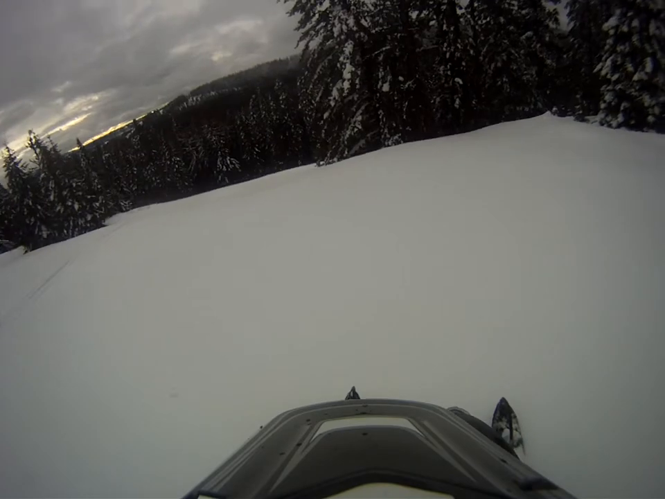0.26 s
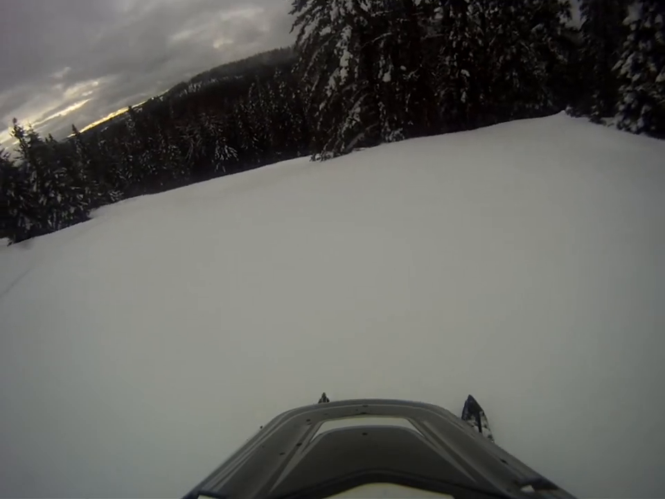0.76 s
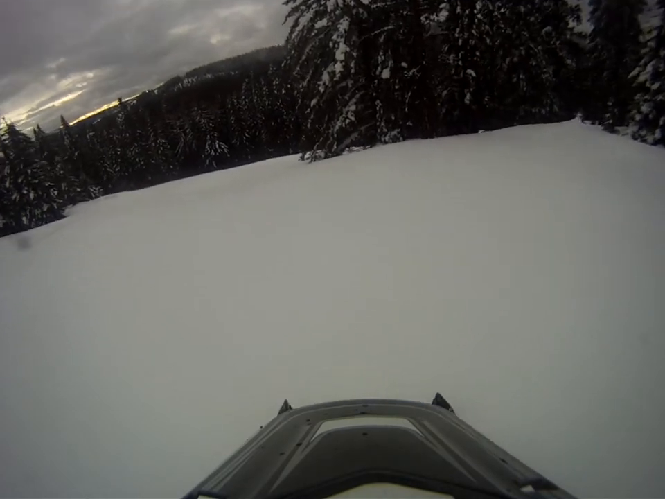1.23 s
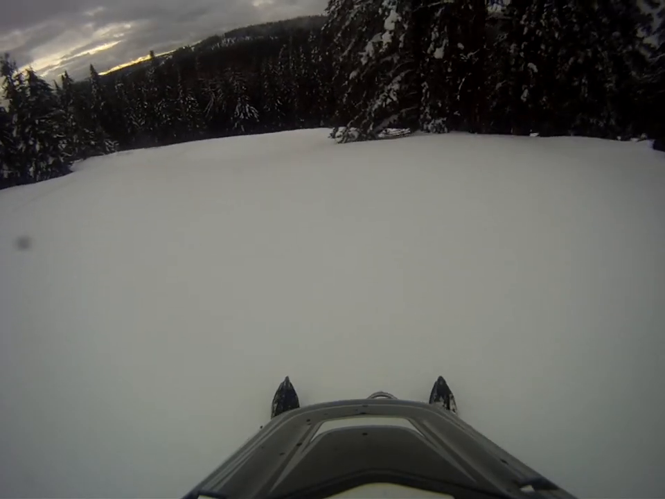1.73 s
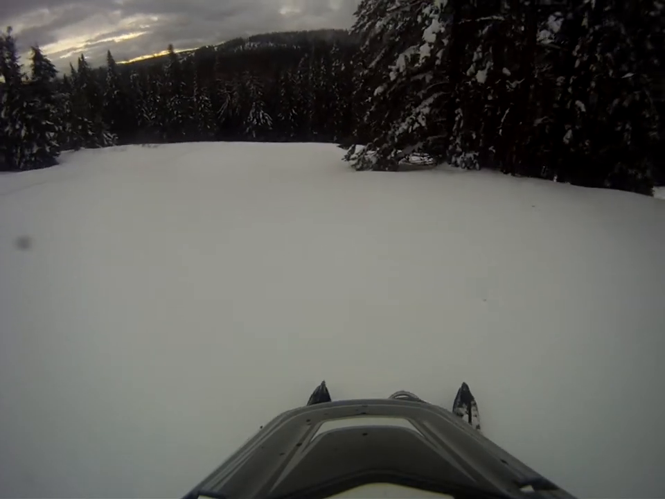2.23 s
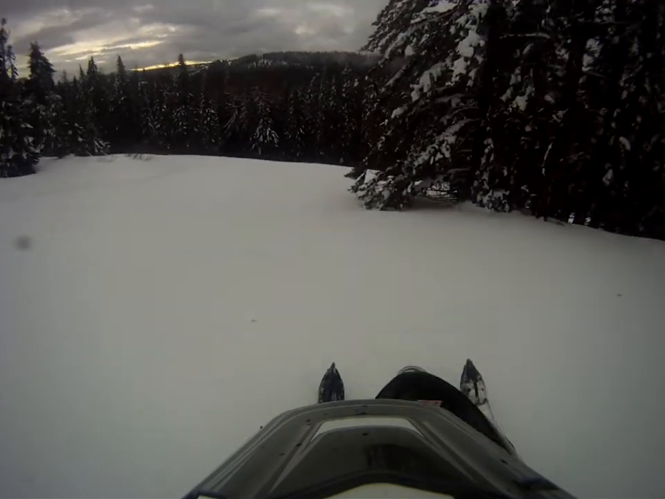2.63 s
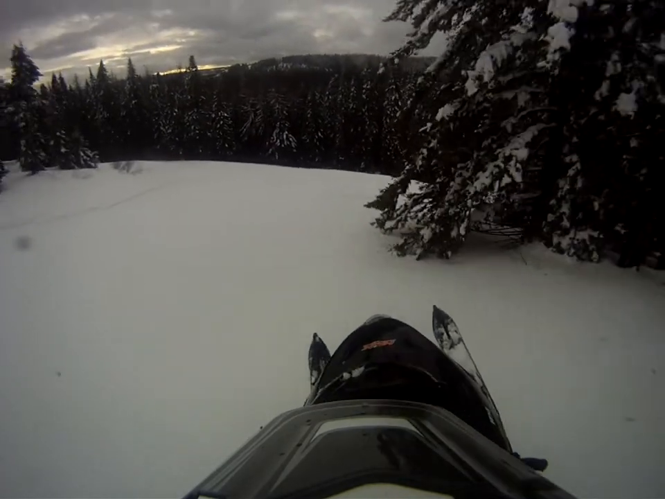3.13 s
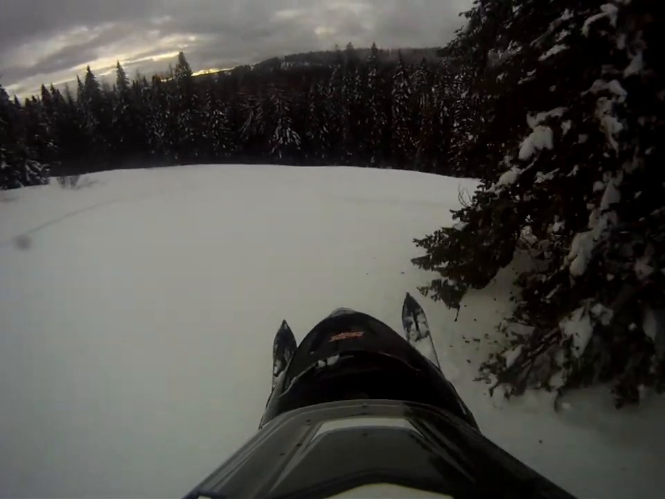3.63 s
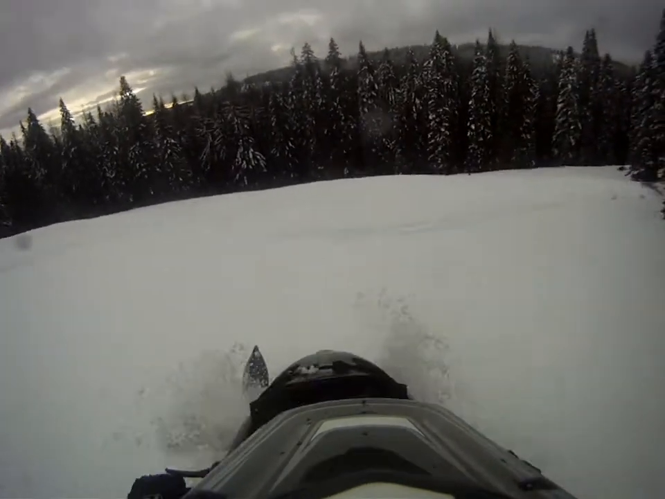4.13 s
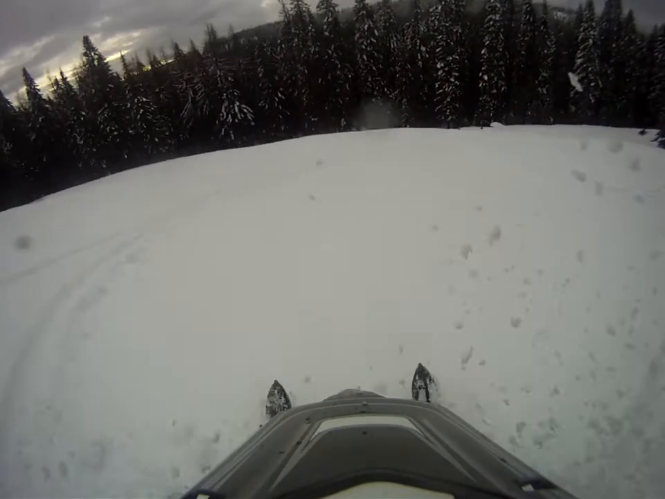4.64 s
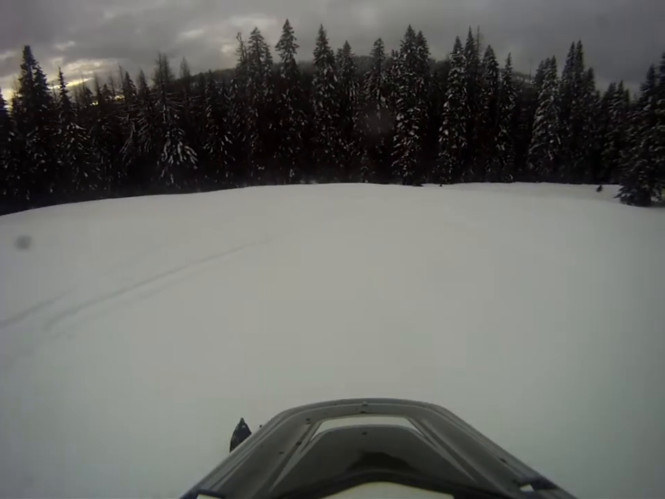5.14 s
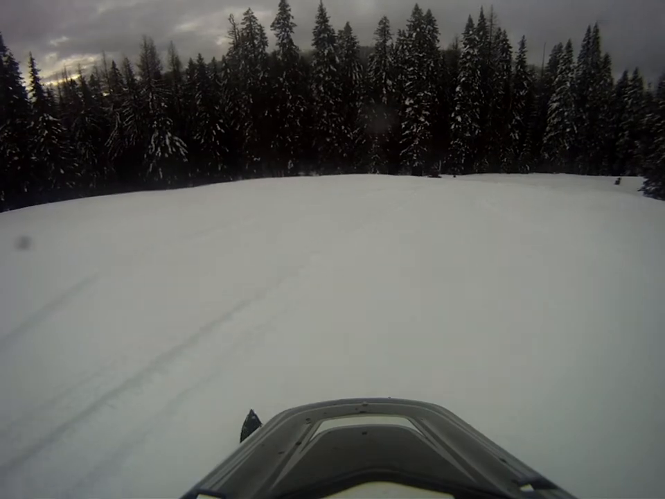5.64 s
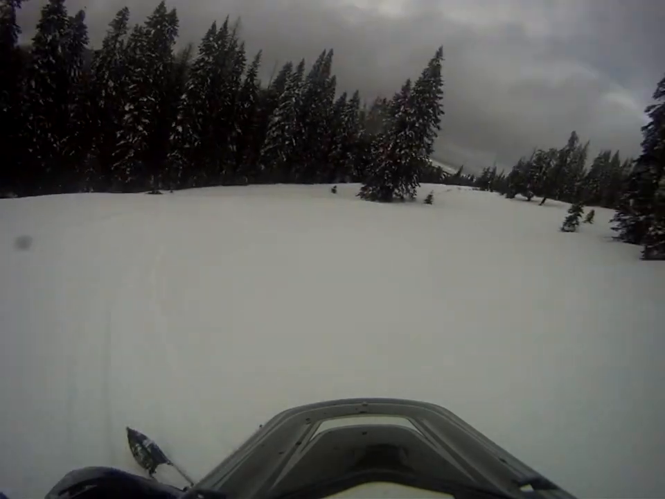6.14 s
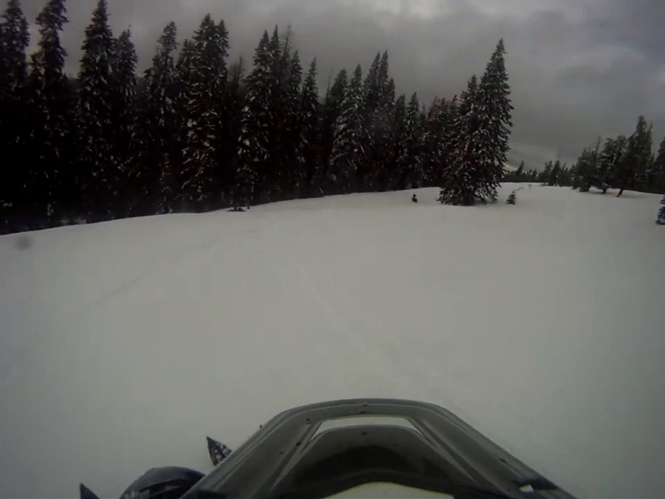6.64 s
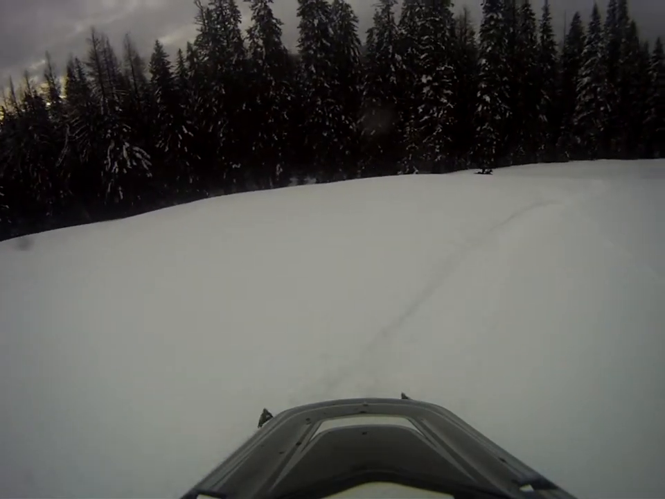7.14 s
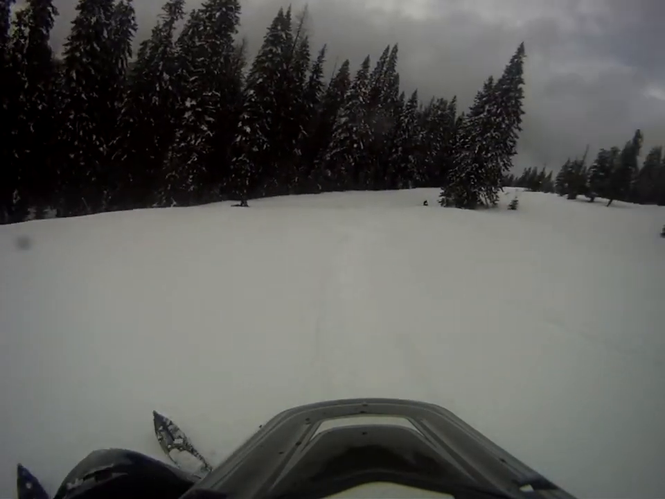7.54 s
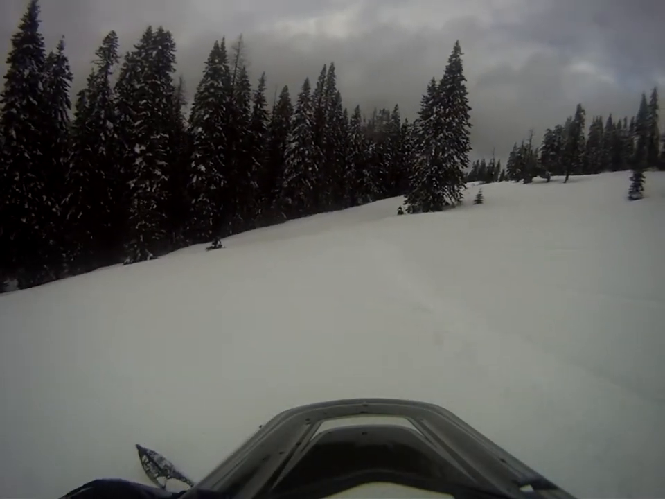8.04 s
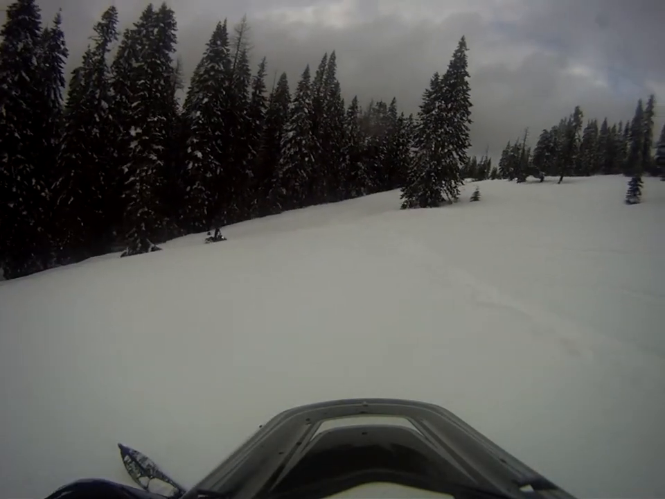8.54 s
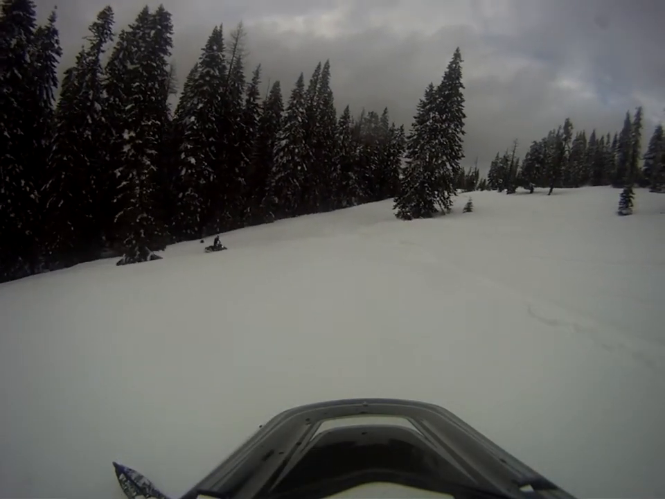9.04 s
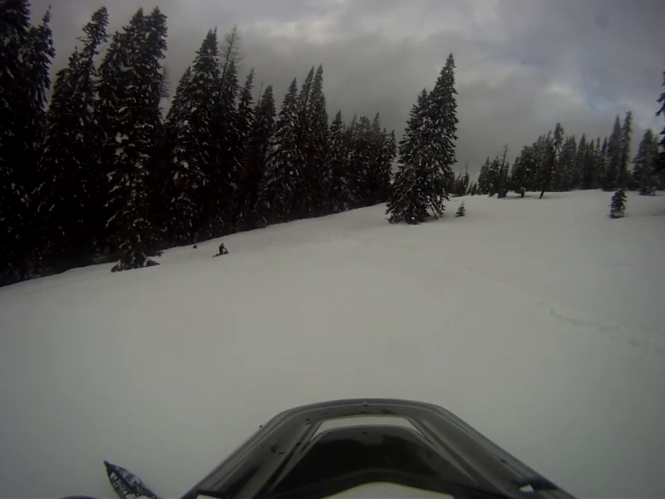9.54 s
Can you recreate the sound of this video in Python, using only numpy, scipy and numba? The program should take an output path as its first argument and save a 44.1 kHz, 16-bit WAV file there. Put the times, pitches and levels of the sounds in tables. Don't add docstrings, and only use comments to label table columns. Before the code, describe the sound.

Close, harsh helmet-camera sound of a snowmobile outdoors in snow: short revs, a steady rise to full throttle, chassis rumble and drive whine, then a single violent knock that makes the level duck. Snow ticks against the plastic housing as the revs fall. The engine settles to uneven popping with soft bumps, and another sled's thin, bright revving comes from farther up the slope near the end.

```python
import sys
import numpy as np
from scipy import signal
from scipy.fft import rfft, irfft
from scipy.io import wavfile
from numba import njit

SR = 44100
rng = np.random.default_rng(int(sys.argv[2]) if len(sys.argv) > 2 else 0)


def volts_from_decibels(level):
    exponent = np.asarray(level, float) / 20
    return 10 ** exponent


def generate_wav(signal):
    frames = np.transpose(np.atleast_2d(signal))
    scaled = np.clip(frames, -1, 1) * 32767
    pcm = np.round(scaled).astype(np.int16)
    wavfile.write(sys.argv[1], SR, pcm)


N = 431298


def rms_one(x):
    return x / np.sqrt(np.mean(x ** 2) + 1e-20)


def in_time(rows):
    s, *columns = np.transpose(rows)
    return [np.interp(np.arange(N) / SR, s, c) for c in columns]


def at_hz(points, hz):
    points_hz, points_db = np.transpose(points)
    return np.interp(np.log(hz), np.log(points_hz), points_db)


def lag(x, lag_s):
    r = np.exp(-1 / (lag_s * SR))
    return signal.lfilter([1 - r], [1, -r], x)


def drift(rate_hz, step=1):
    r = np.exp(-80 * np.pi * rate_hz / SR)
    noise = rng.standard_normal(N // 40 + 2002)
    slow = signal.lfilter([1], [1, -2 * r, r * r], noise)[2000:]
    return np.interp(np.arange(0, N, step) / 40, np.arange(len(slow)), rms_one(slow))


def colour(x, spectrum, rings=()):
    size = 1 << 14
    hz = np.maximum(np.fft.rfftfreq(size, 1 / SR), 1)
    level_db = np.maximum(at_hz(spectrum, hz), -75)
    for centre_hz, width_hz, top_db in rings:
        level_db = level_db + top_db / (1 + (2 * (hz - centre_hz) / width_hz) ** 2)
    cepstrum = irfft(np.log(volts_from_decibels(level_db)))
    cepstrum[1:size // 2] *= 2
    cepstrum[size // 2 + 1:] = 0
    pulse = irfft(np.exp(rfft(cepstrum)))
    return signal.oaconvolve(x, pulse / np.sqrt(np.sum(pulse ** 2)))[:N]


def ring(x, hz, t60_s):
    r, w = volts_from_decibels(-60 / (t60_s * SR)), 2 * np.pi * hz / SR
    return signal.lfilter([0, np.sin(w)], [1, -2 * r * np.cos(w), r * r], x + 1e-18)


# f/Hz, level/dB per Hz
CASE_SPECTRUM = [(480, -28.5), (820, -10), (937, -6), (1100, -4.5), (1150, -0.5), (1290, -8.5), (1580, -1),
                 (1930, -1), (2400, -2.5), (3010, -14), (3490, -4), (3730, -14), (4410, -23), (5430, -14.5),
                 (6000, -8), (7800, -101), (13200, -120)]


def through_case(x, rings=()):
    return colour(x, CASE_SPECTRUM, rings)


# t/s, chassis shake/dB, hiss brightness/dB
RIDE_COURSE = [(0, 0.1, -5.5), (2.4, 2, -4.5), (3.2, 9.5, 3.6), (4, 14.5, 7), (5.2, 10, 4), (6.1, 4, 9),
               (6.6, 0.5, 0.5), (8.1, -2, 3.2), (9.78, 0.5, 1.1)]


def ride():
    return in_time(RIDE_COURSE)


# f/Hz, level/dB per Hz
DRONE_SPECTRUM = [(53, -25.5), (90, 2.5), (129, -3.5), (195, -7.5), (312, -6), (343, -11), (389, -4),
                  (454, -10), (612, -20.5), (687, -24), (749, -2), (849, -25), (900, -7.5), (1170, -11),
                  (1980, -120)]
# f/Hz, level/dB per Hz
RUMBLE_SPECTRUM = [(7.1, -61), (12, -17), (22, -44), (40, -2.5), (54, -19), (65, 1.5), (86, -48),
                   (120, -35), (160, -39), (260, -120)]
# t/s, level/dB, length/s
SKI_BUMPS = [(.28, 10, 0.13), (2.25, 0, 0.32), (3.1, -1, .1), (3.66, 4, 0.18), (3.99, 6, 0.1),
             (4.5, -5.5, 0.26), (6.2, 6, 0.17), (6.766, 15, 0.055), (7.4, 3, 0.23), (7.673, 13, 0.24),
             (7.9, 0, 0.043)]
# t/s, level/dB, f/Hz, t60/s
MOUNT_JOLTS = [(0.311, -34, 103, .15), (0.631, -36.5, 85, 0.27), (.85, -35, 85, 0.27),
               (1.017, -30, 117, 0.19), (1.27, -35, 80, .2), (4.1, -20.5, 50.7, 0.67),
               (4.144, 17.5, 393, 0.017), (4.145, -4, 57, 0.28), (4.718, -6.5, 310, 0.0077),
               (4.721, -25.5, 57, 0.78), (6.802, -22.5, 57, 0.71), (6.811, -31, 154, 0.11),
               (6.815, -29, 334, 0.03)]
MOUNT_HZ = 57
DRONE_DB, RUMBLE_DB = -54.5, -56
RUMBLE_FOLLOWS_SHAKE, DRONE_FOLLOWS_BUMP = 0.92, 0.24


def chassis():
    t = np.arange(N) / SR
    shake_db = ride()[0]
    bump_db = sum(level_db * np.exp(-((t - s) / length_s) ** 2) for s, level_db, length_s in SKI_BUMPS)
    drone = colour(rng.standard_normal(N) * volts_from_decibels(1.5 * drift(12)), DRONE_SPECTRUM)
    lumps = rng.standard_normal(N) * volts_from_decibels(1.5 * drift(5))
    rumble = colour(lumps, RUMBLE_SPECTRUM, [(MOUNT_HZ, 9, 9)])
    out = volts_from_decibels(DRONE_DB + shake_db + DRONE_FOLLOWS_BUMP * bump_db) * rms_one(drone)
    out += volts_from_decibels(RUMBLE_DB + RUMBLE_FOLLOWS_SHAKE * shake_db + bump_db) * rms_one(rumble)
    for s, level_db, hz, t60_s in MOUNT_JOLTS:
        click = np.arange(N) == round(s * SR)
        out += volts_from_decibels(level_db) * ring(click, hz, t60_s)
    return out


# t/s, f/Hz
FAR_CRANK = [(8.7, 128), (9.05, 131), (9.25, 139), (9.4, 146), (9.52, 153.8), (9.78, 153.5)]
# t/s, level/dB
FAR_LOUDNESS = [(8.6, -82), (8.9, -66), (9.2, -51), (9.45, -51.5), (9.55, -47.5), (9.78, -51.5)]
# t/s, level/dB, length/s
FAR_HISS_SWELLS = [
    (8.337, -51, 0.22),
    (9.32, -49, 0.21),
]
FAR_START_S, FAR_HISS_FROM_HZ = 8.5, 3750


def far_machine():
    t = np.arange(N) / SR
    start, lines = round(FAR_START_S * SR), np.zeros(N)
    crank_turns = np.cumsum(in_time(FAR_CRANK)[0][start:]) / SR
    for k in range(5, 36):
        swell_turns = rng.random() + crank_turns * rng.uniform(.005, .02)
        swell = volts_from_decibels(4 * np.sin(2 * np.pi * swell_turns))
        lines[start:] += swell * np.cos(2 * np.pi * (k * crank_turns + rng.random()))
    high_pass = signal.butter(4, FAR_HISS_FROM_HZ, "high", fs=SR, output="sos")
    hiss = signal.sosfilt(high_pass, through_case(rng.standard_normal(N), [(5300, 390, 3.9)]))
    swells = sum(volts_from_decibels(level_db) * np.exp(-((t - s) / length_s) ** 2)
                 for s, level_db, length_s in FAR_HISS_SWELLS)
    return volts_from_decibels(in_time(FAR_LOUDNESS)[0] - 6.5) * rms_one(through_case(lines)) + swells * rms_one(hiss)


# t/s, f/Hz, level/dB
LUG_TONE = [(2.2, 87.9, -33.5), (2.499, 107.1, -28), (2.75, 151.5, -29), (2.878, 180, -31),
            (3.156, 244.6, -23), (3.35, 283, -32), (3.62, 297, -24), (3.86, 300, -29), (4.078, 200, -27)]


def track():
    rows = np.array(LUG_TONE)
    fade_in, fade_out = rows[:1] - [.15, 10, 40], rows[-1:] + [.1, 8, -70]
    hz, level_db = in_time(np.vstack([fade_in, rows, fade_out]))
    return volts_from_decibels(level_db - 16.0 + drift(9.5)) * np.sin(2 * np.pi * np.cumsum(hz) / SR)


# t/s, peak level/dB, f/Hz, t60/s
LANDING_KNOCK = (4.1416, 33, 2300, .019)
# t/s, peak level/dB, f/Hz, t60/s
SNOW_TICKS = [(4.146, 30.5, 2610, 0.011), (4.3558, -18.5, 2400, 0.036), (4.368, -39, 1930, .018),
              (4.3699, -2, 4900, .012), (4.3768, -21, 2100, 0.0095), (4.3826, -3, 2080, 0.0087),
              (4.4012, -10, 2230, 0.026), (4.4118, -12, 1360, 0.0073), (4.433, -15, 2200, 0.031),
              (4.519, -19, 3500, .03), (4.636, -42, 1697, .02), (4.638, 0, 1760, 0.0075),
              (4.6405, -15, 1300, 0.049), (4.665, -8, 2110, 0.0054), (4.7175, -12, 2050, 0.0078),
              (4.7187, 19, 2180, 0.0093), (4.7235, 1.5, 3600, 0.022), (4.7435, -7, 4300, 0.018),
              (4.755, -7.5, 2030, 0.033), (6.807, -25.5, 1260, 0.016), (6.8145, -28.5, 1840, .041),
              (7.568, -36, 2050, 0.026), (7.5995, -27, 1860, 0.036), (7.65, -31, 1210, 0.034),
              (.022, -42, 1220, 0.014)]
CRACK_SHARE = 0.29


def hits():
    out, t = np.zeros(N), np.arange(round(.12 * SR)) / SR
    grit = rms_one(through_case(rng.standard_normal(N))) * 2.18
    for s, peak_db, hz, t60_s in [LANDING_KNOCK] + list(SNOW_TICKS):
        i = round(s * SR)
        fade = volts_from_decibels(peak_db - 60 * t / t60_s) * (1 - np.exp(-t / .0002))
        tone = np.sin(2 * np.pi * hz * t)
        out[i:i + len(t)] += fade * ((1 - CRACK_SHARE) * tone + CRACK_SHARE * grit[i:i + len(t)])
    return out


# t/s, f/Hz
FIRING_RATE = [(0, 117.5), (.3, 104.6), (.47, 137), (.6, 163), (.8, 132), (1, 121.5), (1.19, 142.1),
               (1.31, 134.1), (1.52, 148.6), (2.05, 178), (2.44, 195), (2.63, 245.3), (2.85, 272.5),
               (3.3, 277.4), (3.7, 267.8), (3.86, 266.9), (3.97, 218), (4.12, 182)]
COAST_FROM_S, COAST_FROM_HZ, COAST_SAG_HZ_PER_S = 4.3, 167, 49
CLUTCH_LETS_GO_S, IDLE_REACHED_S, IDLE_HZ = 6.1, 6.5, 41


def speed():
    dragged_hz = COAST_FROM_HZ - COAST_SAG_HZ_PER_S * (CLUTCH_LETS_GO_S - COAST_FROM_S)
    coast = [(COAST_FROM_S, COAST_FROM_HZ), (CLUTCH_LETS_GO_S, dragged_hz), (IDLE_REACHED_S, IDLE_HZ)]
    return in_time(list(FIRING_RATE) + coast)[0]


def coasting_and_idling():
    return in_time([(FIRING_RATE[-1][0], 0, 0), (COAST_FROM_S, 1, 0),
                    (CLUTCH_LETS_GO_S, 1, 0), (IDLE_REACHED_S, 1, 1)])


def on_song(per_s):
    from_hz, full_hz = 195, 250
    return np.clip((per_s - from_hz) / (full_hz - from_hz), 0, 1)


# opened t/s, shut t/s, level/dB, dying away/s
THROTTLE_PULLS = [
    (0.308, 0.59, 0, 0.086),
    (.99, 1.176, -3, 0.09),
    (1.32, 3.86, -2.7, .4),
]
OPEN_S = 0.03


def throttle():
    t, opening, pull_db = np.arange(N) / SR, 0, 0
    for opened_s, shut_s, level_db, dying_s in THROTTLE_PULLS:
        rise, fall = (t - opened_s) / OPEN_S, 1 - (t - shut_s) / dying_s
        held = np.clip(np.minimum(rise, fall), 0, 1)
        opening, pull_db = opening + held, pull_db + held * level_db
    return np.minimum(opening, 1), pull_db


# f/Hz, level/dB per Hz
PIPE_SPECTRUM = [(59, -46), (100, -18), (279, -12.5), (405, -21), (557, -14.5), (717, -25.5), (1000, 5.5),
                 (1380, -1.5), (1690, 8.5), (1870, 4.5), (2260, 4.5), (2850, -17), (3800, -7), (4810, -22),
                 (5600, -5.5), (7280, -50), (12300, -120)]
HEADER_HZ, HEADER_WIDTH_HZ, HEADER_DB = 1150, 230, 9


def harmonics(per_s, low_db, lugging):
    block = 64
    crank_turns = np.cumsum(per_s) / SR / 2 + .001 * drift(40)
    out, power = 0, 0
    for k in range(1, 40):
        if k in (2, 4, 6):
            continue
        hz = k * per_s[::block] / 2
        pipe_db = at_hz(PIPE_SPECTRUM, hz)
        level_db = pipe_db - 3.0 * (k in (7, 8)) + low_db[::block] * (hz < 720) - 7 * (abs(hz - 850) < 60)
        level_db += HEADER_DB * lugging[::block] * np.exp(-((hz - HEADER_HZ) / HEADER_WIDTH_HZ) ** 2)
        level_db += 3 * (k % 2 == 0) + 4 * (k in (12, 20))
        gain = volts_from_decibels(level_db + 2.6 * drift(4, step=block))
        power = power + (hz > 880) * volts_from_decibels(2 * pipe_db)
        phase = (2 * np.pi * k * crank_turns % (2 * np.pi)).astype(np.float32)
        out = out + np.repeat(gain, block)[:N] * np.cos(phase + 1.1 * rng.standard_normal())
    return out / np.repeat(np.sqrt(np.maximum(power, 1)), block)[:N]


# f/Hz, width/Hz, level/dB
PANEL_RINGS = [(1030, 153, 1.5), (1309, 186, 14.5), (1993, 72, 5), (2230, 24, 7), (3720, 53, 10.5),
               (4000, 81, 6.5), (816, 40, -25), (3213, 105, -9.5)]
CLEAN_SHUT, CLEAN_OPEN, CLEAN_FULL = .03, .22, .43
LOW_SHUT_DB, LOW_OPEN_DB, LOW_IDLE_DB = 15.5, 8.5, -7
LUG_HZ_PER_S, LUG_LINGERS_S = 65, 0.1


def roar():
    per_s, opening, idling = speed(), throttle()[0], coasting_and_idling()[1]
    turns = np.cumsum(per_s) / SR
    clean = CLEAN_SHUT + CLEAN_OPEN * opening + CLEAN_FULL * on_song(per_s) * opening ** 4
    clean = np.clip(clean * (1 - idling), 0, 1)

    gate = 1 + clean * (.5 * np.cos(np.pi * turns) + .2 * np.cos(2 * np.pi * turns))
    air = rng.standard_normal(N) * gate * volts_from_decibels(.5 * drift(9) + .8 * drift(40))
    hiss = through_case(rms_one(air), PANEL_RINGS)
    treble = signal.sosfiltfilt(signal.butter(3, 2800, "high", fs=SR, output="sos"), hiss)
    hiss += (volts_from_decibels(ride()[1]) - 1) * treble

    low_db = LOW_SHUT_DB + (LOW_OPEN_DB - LOW_SHUT_DB) * opening + (LOW_IDLE_DB - LOW_SHUT_DB) * idling
    gaining = np.clip(np.gradient(per_s) * SR / LUG_HZ_PER_S, 0, 1)
    lugging = lag(gaining, LUG_LINGERS_S)
    return np.sqrt(clean) * harmonics(per_s, low_db, lugging) + np.sqrt(1 - clean) * hiss


# f/Hz, level/dB
EXHAUST_GAIN = [(110, -46.5), (155, -41), (200, -42), (277, -38), (370, -46), (490, -43.5), (548, -34),
                (620, -49), (830, -38.5)]
DRAGGED_TONES_DB = (-47, -59, -56, -63)
ORDER_DB, SHUT_DB, IDLE_TONE_DB = (5.7, -5, -2, -13), (-13.5, -14, -9, -7.5), -67
SONG_SECOND_DB, PIPE_WARMS_S = 16, 0.25


def firing_tones():
    per_s, (opening, pull_db) = speed(), throttle()
    coasting, idling = coasting_and_idling()
    turns = np.cumsum(per_s) / SR
    song_db = SONG_SECOND_DB * lag(on_song(per_s), PIPE_WARMS_S)
    tones = 0
    for k, order_db in enumerate(ORDER_DB, 1):
        driven_db = order_db + at_hz(EXHAUST_GAIN, k * per_s) + pull_db
        driven_db = driven_db + SHUT_DB[k - 1] * (1 - opening) + song_db * (k == 2)
        dragged_db = DRAGGED_TONES_DB[k - 1] * (1 - idling) + IDLE_TONE_DB * idling
        level_db = (1 - coasting) * driven_db + coasting * dragged_db
        tones = tones + volts_from_decibels(level_db + 1.17 * drift(39)) * np.sin(2 * np.pi * k * turns)
    return tones


# t/s, crank turns so far
IDLE_TURNS = [(6.25, -4), (6.445, 0), (7.343, 18), (7.641, 24.2), (7.982, 30), (8.184, 34), (8.436, 40),
              (8.745, 46), (9.398, 60), (9.78, 67.6)]
# f/Hz, level/dB, t60/s
PIPE_PUTTER = [(85, -5.5, 0.13), (128, -2.5, .05), (241, -11, 0.065), (324, -10.5, 0.1),
               (437, -11.5, 0.066)]
POP_DB, POP_GAIN_DB_PER_S = -59.5, .8


def idle_pops():
    turns, = in_time(IDLE_TURNS)
    lit_at, ports_at = (np.flatnonzero(np.diff(np.floor(k * turns)) > 0) for k in (1, 2))
    lit, thumps = np.zeros((2, N))
    fade_in_db = 6 * np.minimum(turns, 0)
    lit_db = 3 * np.cos(np.pi * np.floor(turns[lit_at + 1])) + rng.standard_normal(len(lit_at))
    lit[lit_at] = volts_from_decibels(lit_db + fade_in_db[lit_at])
    port_db = 2.5 * np.cos(np.pi * np.floor(2 * turns[ports_at + 1]))
    port_db += 1.5 * rng.standard_normal(len(ports_at))
    thumps[ports_at] = volts_from_decibels(port_db + fade_in_db[ports_at])
    puff = ring(lit, 20, .09) * rng.standard_normal(N)
    case = rms_one(ring(puff, 1336, 0.034))
    pipe = sum(volts_from_decibels(level_db) * rms_one(ring(thumps, hz, t60_s)) for hz, level_db, t60_s in PIPE_PUTTER)
    return volts_from_decibels(POP_DB + POP_GAIN_DB_PER_S * (np.arange(N) / SR - IDLE_REACHED_S)) * (case + pipe)


# t/s, roar level/dB
ENGINE_EFFORT = [(0, -33.5), (.32, -40), (.52, -30.5), (.66, -34.5), (1.02, -36.5), (1.6, -34),
                 (2.46, -28.5), (2.54, -21.5), (2.66, -22.5), (2.95, -22), (3.3, -21.5), (3.84, -19),
                 (4.12, -27.5), (5.2, -31.5), (6.3, -44), (7.2, -46), (7.8, -51), (9.45, -46.5)]


def engine():
    return volts_from_decibels(in_time(ENGINE_EFFORT)[0]) * roar() + firing_tones() + idle_pops()


def scene():
    return (chassis() + far_machine() + track() + hits() + engine())[None, :]


@njit
def limiter(x, top, fall, hold, keep):
    out, gain, wait = np.empty_like(x), 1., 0.
    for i in range(len(x)):
        out[i] = gain * x[i]
        if abs(out[i]) > top:
            gain, wait = gain * fall, hold
        elif wait > 0:
            wait -= 1
        else:
            gain = gain ** keep
    return out


def roll_off(x):
    return signal.sosfilt(signal.butter(12, 15720, fs=SR, output="sos"), x)


def record(dry):
    camera_hz, fall_db_per_s, hold_s, release_s = 12000, 6200, .06, .045
    smooth = signal.sosfilt(signal.cheby2(8, 28, 5950, fs=SR, output="sos"), dry[0])
    coarse = signal.resample_poly(smooth, 40, 147, window=("kaiser", 2.))
    limited = limiter(coarse, .7, volts_from_decibels(-fall_db_per_s / camera_hz), hold_s * camera_hz,
                      np.exp(-1 / (release_s * camera_hz)))
    held = np.repeat(np.clip(limited, -1, 1), 4)
    x = signal.resample_poly(held, 147, 160)[:N]
    x = np.pad(x, (0, N - len(x)))
    x = signal.sosfiltfilt(signal.cheby2(10, 30, 15750, fs=SR, output="sos"), x)
    mix = np.clip(x, -1, 1)[None, :]
    return roll_off(mix)


dry = scene()
out = record(dry)
generate_wav(out)
```